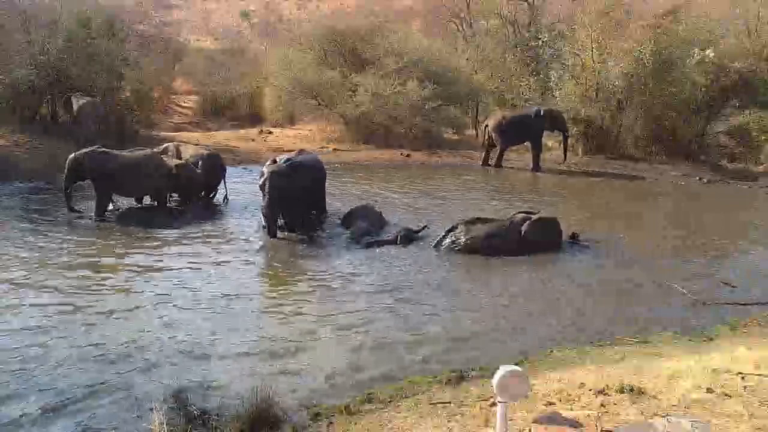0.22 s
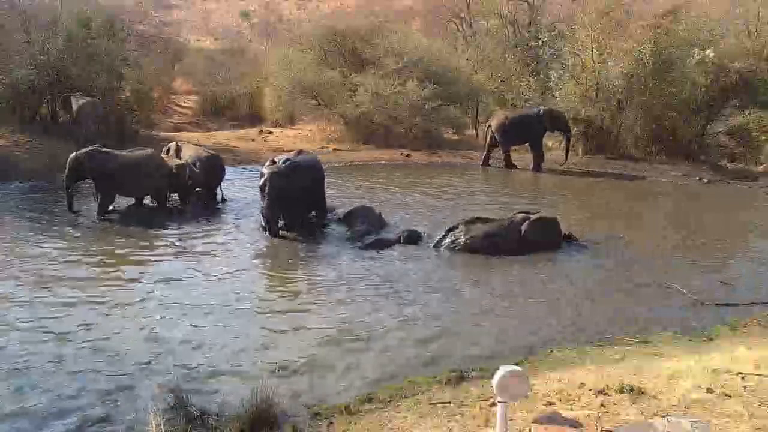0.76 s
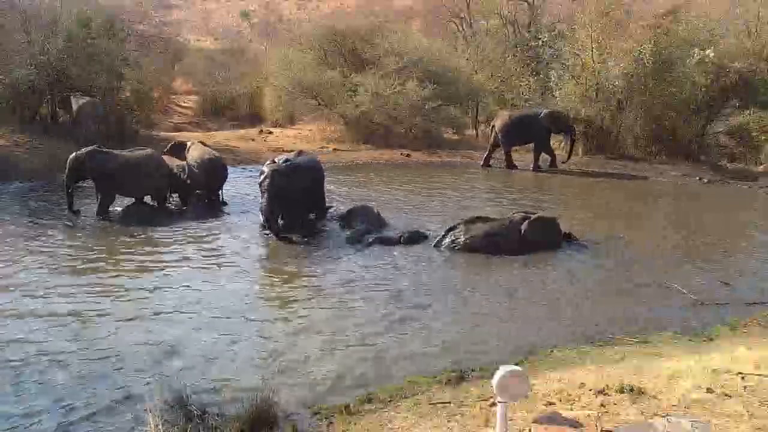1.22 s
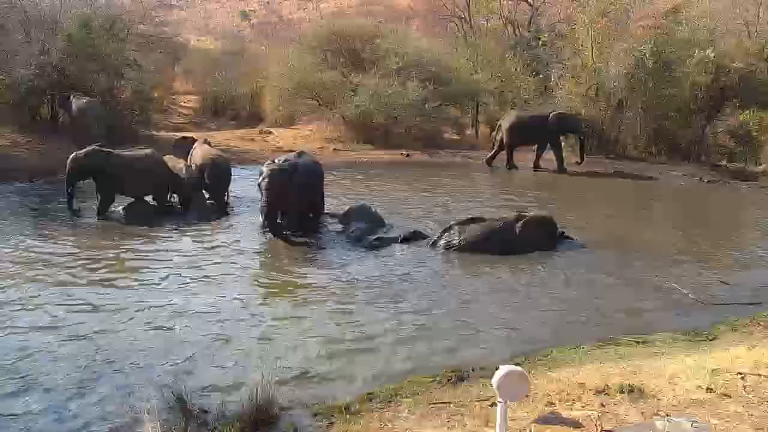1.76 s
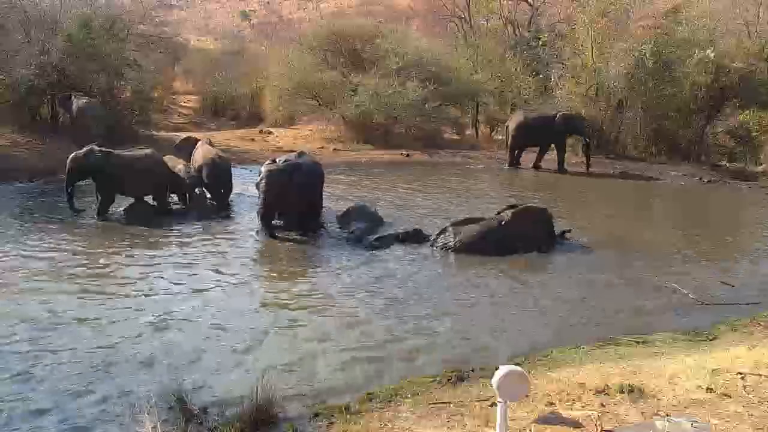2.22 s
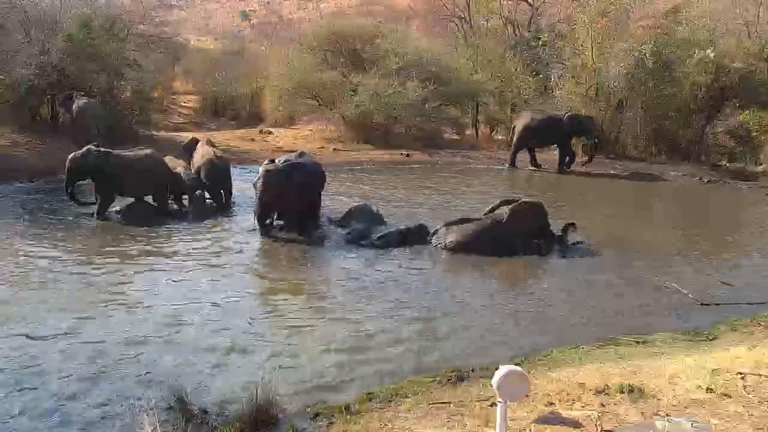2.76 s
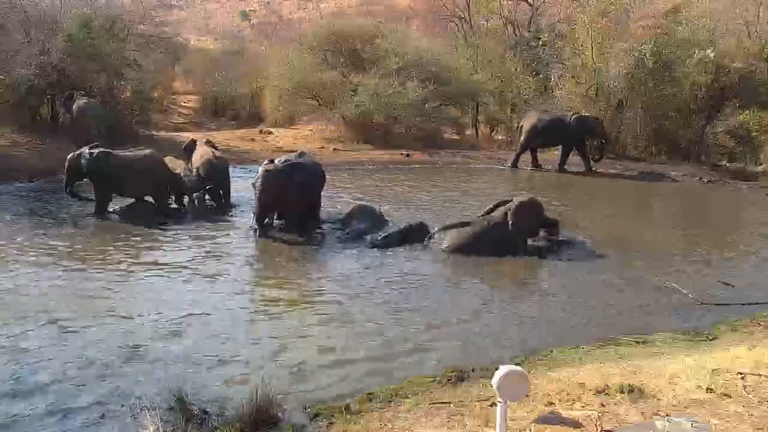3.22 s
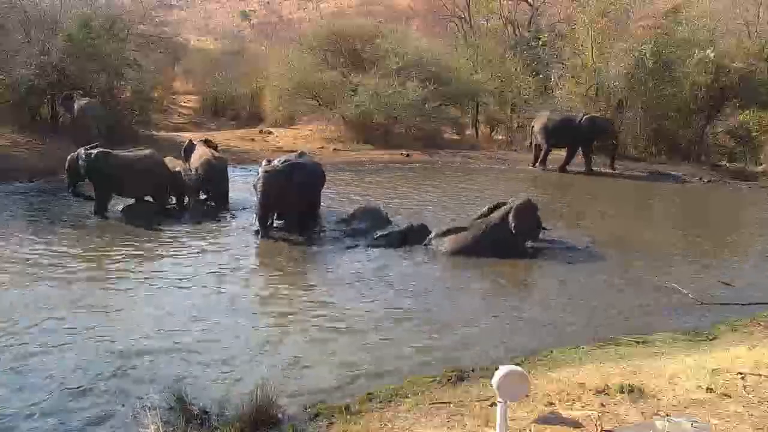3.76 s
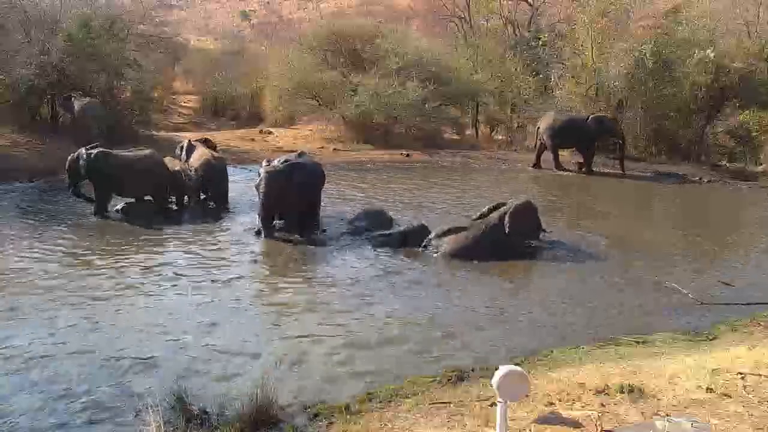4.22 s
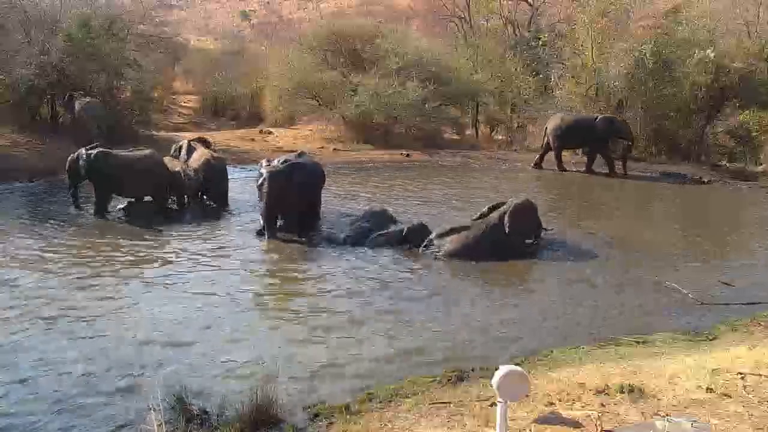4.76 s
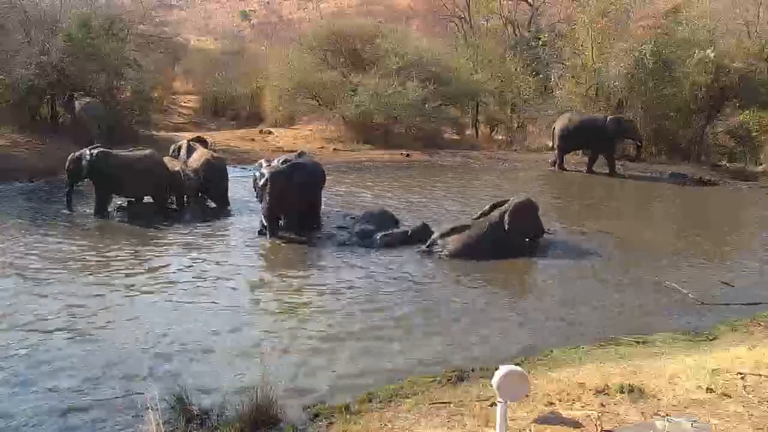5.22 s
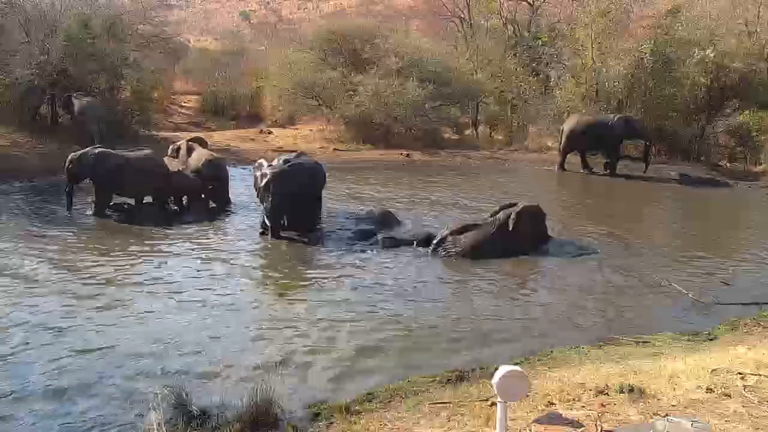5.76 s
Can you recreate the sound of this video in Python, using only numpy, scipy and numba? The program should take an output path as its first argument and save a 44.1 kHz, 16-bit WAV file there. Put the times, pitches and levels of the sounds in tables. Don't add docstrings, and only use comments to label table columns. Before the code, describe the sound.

Elephants wallow in a shallow waterhole, with constant uneven sloshing, hollow plops and gulps, and one hard splash early on.

```python
import sys
import numpy as np
from scipy import signal
from scipy.fft import rfft, irfft
from scipy.io import wavfile
from scipy.ndimage import uniform_filter1d
from numba import njit

SR = 44100
rng = np.random.default_rng(int(sys.argv[2]) if len(sys.argv) > 2 else 0)


def unload_wav(signal):
    wavfile.write(
        sys.argv[1],
        SR,
        np.round(np.clip(np.atleast_2d(signal).T, -1, 1) * 32767).astype(np.int16),
    )


def decibels_to_gain(level_db):
    exponent = np.asarray(level_db, float) / 20
    return 10 ** exponent


N = 263718

# [t/s, churning level/dB, thrown level/dB]
CHURN = [(0.0, -43, 0.5), (0.4, -40, 1), (0.55, -38, -3), (0.9, -37.5, 0), (1.15, -39, -2),
         (1.47, -38, 1.5), (1.7, -37.5, 3.5), (2.05, -36, 1.5), (2.5, -34.5, 3), (2.62, -39, 2),
         (3.25, -40, 0.5), (3.75, -42, -0.5), (4.15, -41, -0.5), (4.4, -40, -0.5), (4.95, -41.5, 0),
         (5.3, -41, -2.5), (5.55, -43, -3), (5.98, -40.5, 2.5)]
# [lowest f/Hz, highest f/Hz, rate/(bubbles per s), ring/cycles, size scatter/dB,
# noise share/0-1, shared flicker/dB, own flicker/dB]
BUBBLES = [
    (287.5, 642, 560, 4.6, 0.5, 0.73, 1.17, 1),
    (610.4, 2530, 1500, 11.4, 3.5, 0.55, 0.87, 0.8),
    (2386, 5580, 2500, 15.1, 4.5, 0.64, 0.8, 0.03),
    (5490, 11500, 3000, 15, 9, 0.82, 0.8, 0.4),
]
# [level/dB at usual churning, slope/dB per dB churning,
# slope/dB per dB thrown]
FOLLOWS = [
    (-35.5, 1.54, -1),
    (-44, 1.22, -.3),
    (-43, 1.11, .2),
    (-60.5, 1, .9),
]
# [t/s, level/dB]
BREEZE = [(0.0, -62), (0.6, -59.5), (2.2, -58), (3, -60), (4.1, -58.5), (4.45, -52.5), (5.3, -57),
          (5.53, -53), (5.98, -58.5)]
# [multiple of mains pitch, level/dB]
HUM = [(8, -58.5), (9, -58.5), (12, -55.5), (13, -64), (15, -70)]
# [t/s, peak level/dB, f/Hz]
SMALL_PLOPS = [(.231, -26.5, 402), (.591, -23, 356), (.813, -23, 357), (.934, -21.5, 306), (1.184, -26, 400),
               (1.363, -22.5, 367), (1.418, -25, 392), (1.762, -24, 380), (1.944, -26, 338), (2.284, -27, 404),
               (2.939, -23, 398), (3.031, -25, 370), (3.207, -25, 374), (3.407, -26.5, 393), (3.907, -27, 370),
               (4.067, -27, 372), (4.372, -22, 374), (4.871, -24.5, 405), (5.19, -29, 377), (5.266, -31, 339),
               (.488, -17.5, 345), (1.068, -21.5, 328), (1.848, -19.5, 371), (3.815, -28.5, 326),
               (5.295, -29, 360), (5.4, -25.5, 350), (5.43, -28, 352), (5.685, -20.5, 378), (5.774, -27, 360),
               (5.959, -27, 403)]
# [t/s, peak level/dB, f/Hz, swell/ms]
DRIPS = [(.25, -34, 1870, 3), (.556, -39, 2260, 3.5), (1.235, -37, 4025, 5.4), (1.578, -36, 990, 4.4),
         (2.41, -40, 1040, 5.5), (3.396, -31, 585, 4.3), (4.815, -30, 554, 3.5), (5.053, -22, 540, 1.35),
         (5.66, -34, 3140, 5.7), (5.68, -34, 3070, 4.5), (5.9, -40, 2700, 7.2)]
# [t/s, peak level/dB, f/Hz, swell/ms]
PLOPS = [(0.264, -21.5, 360, 2.3), (0.522, -17, 382, 5.4), (0.747, -13, 375, 6.9), (0.893, -19.5, 345, 4.5),
         (1.05, -19.5, 342, 4), (1.122, -22, 330, 3.9), (1.438, -22, 359, 4.6), (1.5142, -6, 374, 3.3),
         (1.656, -20, 375.6, 7.6), (1.827, -21, 397, 10), (1.891, -14.5, 360, 4.3), (1.972, -19.5, 356, 6),
         (2.002, -17, 336, 7), (2.049, -18.5, 325, 7.3), (2.113, -19.5, 342, 8.4), (2.185, -15.5, 361, 2.2),
         (2.233, -18.5, 363, 3.6), (2.303, -17, 396, 5.2), (2.386, -16.5, 328, 3.8),
         (2.429, -18.5, 342, 4.7), (2.457, -15.5, 350, 4.8), (2.494, -21.5, 358, 4.1),
         (2.531, -23, 383, 6.6), (2.681, -23.5, 302, 6.4), (3.577, -17.5, 361, 5.7), (3.679, -25, 371, 5.9),
         (4.228, -14.5, 367, 4.5), (4.315, -20.5, 371, 4.4), (4.349, -20, 361, 4.1),
         (5.216, -20.5, 366, 6.8)]
# [t/s, peak level/dB, f/Hz, swell/ms]
GLUGS = [(.27, -37, 208, 13), (.695, -33, 206, 13), (1.04, -32, 162, 9.2), (1.2, -40.5, 170, 14),
         (1.524, -30.5, 155, 13), (1.546, -27.5, 203, 6.9), (2.14, -32.5, 173, 13), (3.33, -39, 226, 11),
         (3.575, -40, 149, 9.1), (4.55, -37, 213, 14), (5.1, -36, 199, 15), (5.16, -33, 255, 8.6)]
# [t/s, peak level/dB, f/Hz, swell/ms]
BLOWS = [(1.5165, -10, 450, 1.6), (1.514, -27, 164, 3), (1.538, -14, 365, 4), (1.3, -26, 510, 1.8),
         (.733, -16, 363, 5.5), (.752, -21.5, 550, 4), (.772, -19, 380, 2.6), (.51, -24.5, 278, 6),
         (2.55, -25, 284, 8), (4.3, -24.5, 297, 5), (.295, -26.5, 374, 5), (5.03, -28, 350, 9),
         (5.32, -27.5, 373, 4), (5.67, -30, 285, 9), (5.268, -18.5, 257, 2.6)]
# [middle t/s, peak level/dB, mist minus spray/dB, wash minus spray/dB,
# half length/ms]
SURGES = [
    (.43, -29.5, -14, -12, 30),
    (.565, -25, -16, 1.5, 30),
    (1.068, -21, -15, -3, 36),
    (1.91, -21.5, -13, -6, 30),
    (2.5, -23.5, -17, -1, 47),
    (3.03, -28, -14, 1.5, 42),
    (4.36, -27.5, -20, 3, 38),
    (4.43, -25.5, -18, -7, 25),
    (5.8, -26, -22, 0, 45),
]
# [t/s, peak level/dB, mist minus spray/dB, wash minus spray/dB, length/ms]
SLAPS = [(0.5062, -24.5, -17, -18, 30), (0.9795, -19, -11.5, -23, 30), (1.039, -25, -24, 2, 18),
         (1.2306, -21, -21, -11, 18), (1.509, -16, -18, -6, 31), (1.6272, -22.5, -34, -19, 27),
         (2.2927, -22, -30, -14, 11), (2.6673, -20.5, -27, -7, 31), (2.7826, -24.5, -29, -12, 24),
         (2.904, -26.5, -28, 3, 16), (3.096, -20, -20, -18, 13), (3.3483, -20.5, -22, -16, 15),
         (3.412, -24, -20.5, -4, 20), (3.584, -25, -21, 0.5, 29), (3.846, -25, -20, -3, 28),
         (3.9878, -24, -30, -12, 14), (4.558, -21, -29, -17, 13), (4.671, -24, -24, -3, 16),
         (4.778, -23.5, -24, -8, 18), (5.257, -17, -32, -12, 16), (5.868, -24.5, -35, -6, 16)]
# [f/Hz, level/dB per Hz]
COLOUR = [(25, -37.5), (60, -37.5), (120, -30), (220, -31), (500, -35), (1000, -53), (1600, -60.5),
          (2400, -73.5), (3300, -60.5), (4300, -45.5), (5600, -57), (7500, -52), (9500, -56.5),
          (11000, -59)]
# [f/Hz, width/Hz, boost/dB]
HOUSING = [(361, 231, 28.5), (475.4, 37, 4), (852, 370, 11), (1360, 424, 20.5), (1501, 227, -7.5),
           (1895, 29, 10.5), (1980, 89, 2.5), (2016, 610, 33), (2706, 143, 8.5), (2927, 27, 7),
           (2917, 910, 28.5), (3488, 156, 11.5), (3899, 177, -26), (3939, 525, 32), (4156, 82, 12.5),
           (4290, 179, -16.5), (4438, 224, 22.5), (4450, 800, -25), (4820, 48, 6), (5087, 260, 15.5),
           (5440, 320, 5), (5970, 78, 6), (6370, 119, -6), (6390, 1100, 7), (7800, 59, -1), (8350, 310, 11),
           (8470, 65, -12), (9050, 180, 4), (9870, 90, 11), (10800, 100, 11)]

USUAL_CHURN_DB = -40
MAINS_HZ = 99.95
HEAVE_DB, HEAVE_PER_CHURN = -46, 0.51
GUSTINESS_DB, ROLL_DB = 1.8, 1.5
SMALL_PLOP_SWELL_MS = 5.2
HISS_DB = -88
DROPOUTS_PER_S, DROPOUT_DB = 38, -20
TOP_HZ = 11150


def housing(size):
    f = np.fft.rfftfreq(size, 1 / SR) + 1e-3
    hz, db = np.transpose(COLOUR)
    response = decibels_to_gain(np.interp(np.log(f), np.log(hz), db)) + 0j
    for centre_hz, width_hz, boost_db in HOUSING:
        a = decibels_to_gain(boost_db / 2)
        off_centre = centre_hz ** 2 - f ** 2
        response *= (off_centre + 1j * f * width_hz * a) / (off_centre + 1j * f * width_hz / a)
    return response


RESPONSE = housing(N)


def band(x, lo_hz, hi_hz):
    f = np.fft.rfftfreq(N, 1 / SR)
    low_edge = 1 + (lo_hz / (f + 1e-3)) ** 10
    high_edge = 1 + (f / hi_hz) ** 10
    z = rfft(x) / np.sqrt(low_edge * high_edge)
    heard_rms = np.sqrt(2 * np.sum(np.abs(z * RESPONSE) ** 2)) / N
    return irfft(z, N) / heard_rms


def noise_band(lo_hz, hi_hz):
    return band(rng.standard_normal(N), lo_hz, hi_hz)


def curve(table):
    s, *columns = np.transpose(table)
    return [np.interp(np.arange(N) / SR, s, c) for c in columns]


def walk(rate):
    k = int(SR / rate)
    steps = np.repeat(rng.standard_normal(N // k + 2), k)
    return 0.97 * uniform_filter1d(uniform_filter1d(steps, k), k)[:N]


def steadied(x, hold_s, strength):
    heard = irfft(rfft(x) * RESPONSE, N)
    power = uniform_filter1d(heard ** 2, int(hold_s * SR))
    return x / (power + 0.022) ** (np.clip(strength, 0, 1) / 2)


@njit
def ring(start, hz, size, cycles, rise):
    out = np.zeros(N)
    for k in range(len(start)):
        span = cycles * SR / hz[k]
        z = size[k] + 0j
        turn = np.exp(2j * np.pi * hz[k] / SR - 3 / span)
        bend = np.exp(2j * np.pi * hz[k] / SR * rise / span)
        for i in range(start[k], min(start[k] + int(2 * span), N)):
            out[i] += z.imag
            z *= turn
            turn *= bend
    return out


def bubbles(lo_hz, hi_hz, rate, cycles, scatter_db, share):
    when, pitch, odds = rng.random((20000, 3))[:int(rate * N / SR)].T
    start = (when * N).astype(np.int64)
    hz = 0.8 * lo_hz * (1.4 * hi_hz / lo_hz) ** pitch
    size = hz * decibels_to_gain(-scatter_db * np.log(1 - 0.97 * odds))
    cloud = band(ring(start, hz, size, 1. * cycles, 0.16), lo_hz, hi_hz)
    share = np.clip(share, 0, 1)
    return np.sqrt(1 - share) * cloud + np.sqrt(share) * noise_band(lo_hz, hi_hz)


def water():
    surge = walk(21.16) + 1.1 * walk(45)
    bursts = [0, *gushes()]
    churn_db, thrown_db = curve(CHURN)
    out = 0
    for follow, burst, (*cloud, shared_db, own_db) in zip(FOLLOWS, bursts, BUBBLES):
        level_db, per_churn, per_thrown = follow
        level_db = level_db + per_churn * (churn_db - USUAL_CHURN_DB) + per_thrown * thrown_db
        steady = decibels_to_gain(level_db + shared_db * surge + own_db * walk(22.02))
        out = out + np.hypot(steady, burst) * steadied(bubbles(*cloud), 0.04, 0.76)
    return out


def heave():
    level_db = HEAVE_DB + HEAVE_PER_CHURN * (curve(CHURN)[0] - USUAL_CHURN_DB)
    return decibels_to_gain(level_db + ROLL_DB * walk(11)) * steadied(noise_band(127, 252.4), 0.093, 1.0)


def wind():
    gusts = decibels_to_gain(curve(BREEZE)[0] + GUSTINESS_DB * walk(8.1))
    return gusts * steadied(noise_band(8, 109), 0.12, 0.45)


def hiss():
    return decibels_to_gain(HISS_DB) * noise_band(7500, 11200)


def hum():
    out = np.zeros(N)
    for multiple, db in HUM:
        turns = multiple * MAINS_HZ * np.arange(N) / SR + rng.random()
        out += np.sqrt(2) * decibels_to_gain(db) * np.sin(2 * np.pi * turns)
    return out


def pockets(table, glide):
    length = 8192
    out, t, response = np.zeros(N + length), np.arange(length) / SR, housing(length)
    for s, peak_db, hz, swell_ms in table:
        u = t * 1000 / max(swell_ms, 1)
        pocket = u * np.exp(-u) * np.sin(2 * np.pi * hz * t * (1 + glide * u))
        heard_peak = np.abs(irfft(rfft(pocket) * response)).max()
        i = max(int((s - 0.004) * SR), 0)
        out[i:i + length] += pocket * decibels_to_gain(peak_db - 1.0) / heard_peak
    return out[:N]


def small_plops():
    return pockets([(*plop, SMALL_PLOP_SWELL_MS) for plop in SMALL_PLOPS], 0.0057)


def drips():
    return pockets(DRIPS, -0.0047)


def plops():
    return pockets(PLOPS, 0.0057)


def glugs():
    return pockets(GLUGS, 0.0413)


def blows():
    return pockets(BLOWS, -0.0028)


def surge_shape(u, length):
    return np.exp(-(u / length) ** 2)


def slap_shape(u, length):
    return (1 - np.exp(-np.maximum(u, 0) / 0.00038)) / (1 + np.abs(u / length) ** 3)


def gushes():
    out, t = np.zeros((3, N)), np.arange(N) / SR
    for table, shape in ((SURGES, surge_shape), (SLAPS, slap_shape)):
        for s, peak_db, mist_db, wash_db, length_ms in table:
            near = slice(max(int((s - 0.2) * SR), 0), int((s + 0.2) * SR))
            gain = decibels_to_gain(peak_db - 15.5 + np.array([[wash_db], [0], [mist_db]]))
            out[:, near] += gain * shape(t[near] - s, max(length_ms, 2) / 1000)
    return out


def scene():
    air = small_plops() + drips() + plops() + glugs()
    return (water() + heave() + wind() + hiss() + air + blows())[None]


def starved(x):
    hz, s, z = signal.stft(x, SR, nperseg=256)
    when, where = rng.random((int(DROPOUTS_PER_S * N / SR), 2)).T
    for frame, centre_hz in zip((when * len(s)).astype(int), 2600 + 6500 * where):
        hole = np.abs(hz - centre_hz) < 0.07 * centre_hz + 150
        z[..., hole, frame:frame + 2] *= decibels_to_gain(DROPOUT_DB)
    return signal.istft(z, SR, nperseg=256)[1][..., :N]


def roll_off(x):
    return signal.sosfilt(signal.butter(12, 11160, fs=SR, output="sos"), x)


def record(dry):
    heard = irfft(rfft(dry) * RESPONSE, N) + hum()
    top_cut = signal.ellip(8, 0.2, 70, TOP_HZ, fs=SR, output="sos")
    mix = signal.sosfilt(top_cut, starved(heard))
    return roll_off(mix)


dry = scene()
out = record(dry)
unload_wav(out)
```